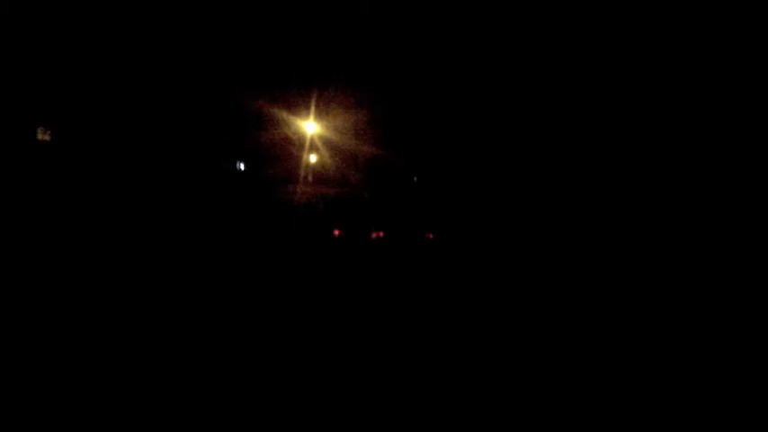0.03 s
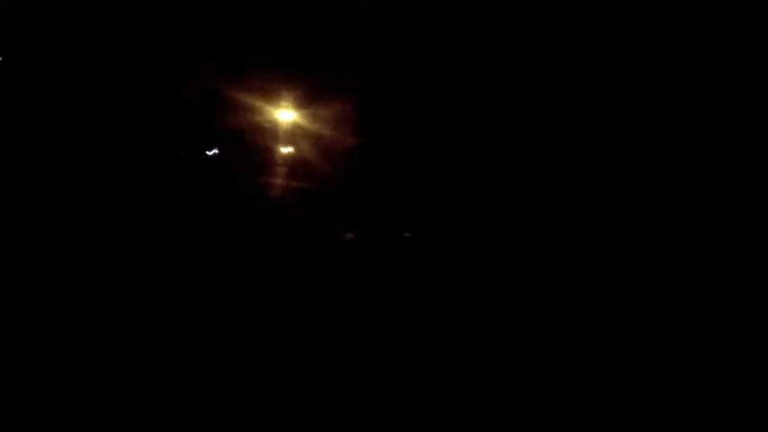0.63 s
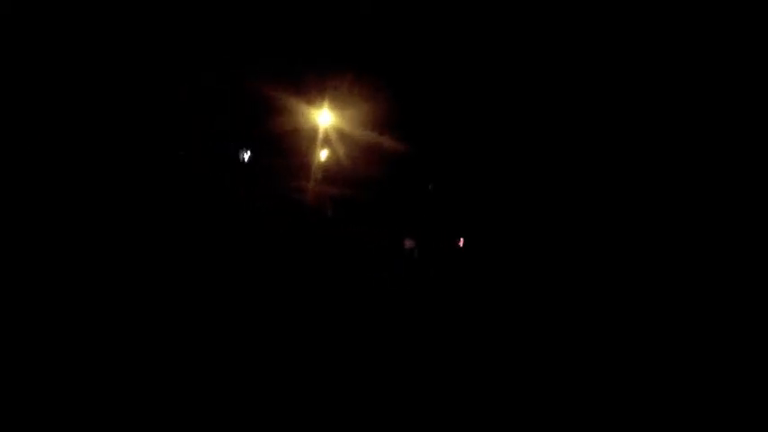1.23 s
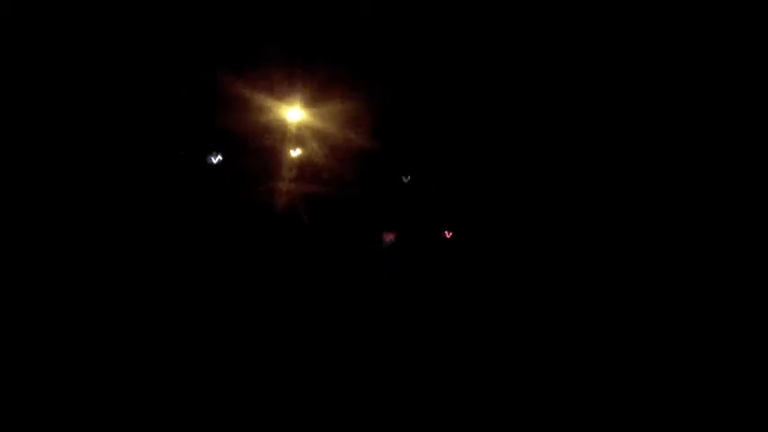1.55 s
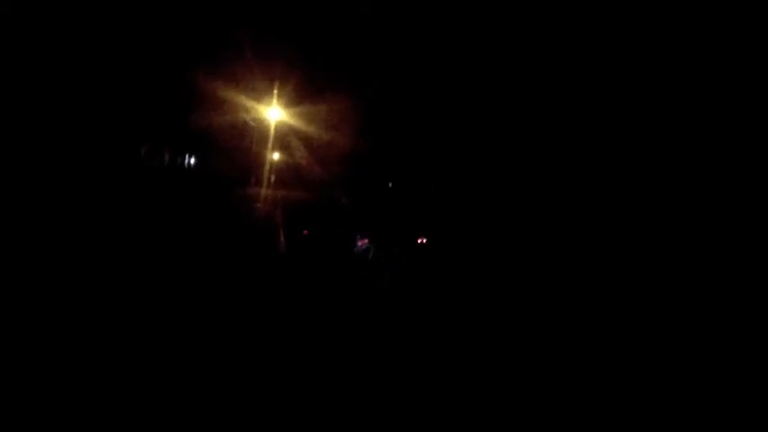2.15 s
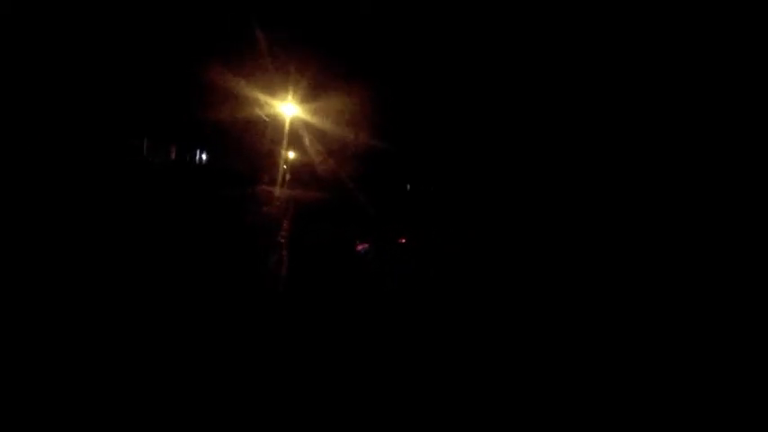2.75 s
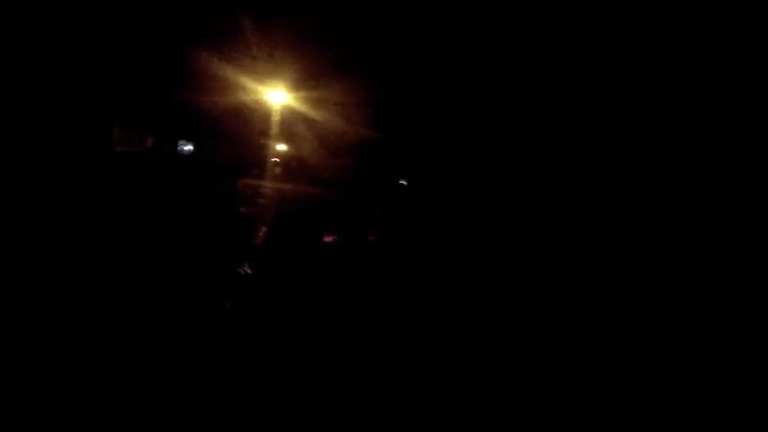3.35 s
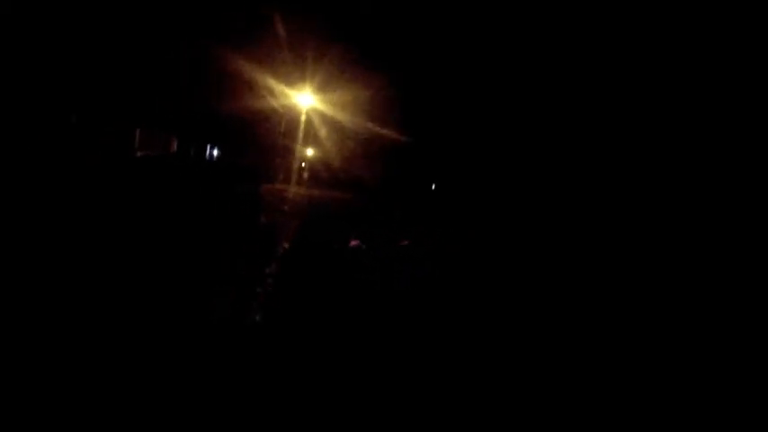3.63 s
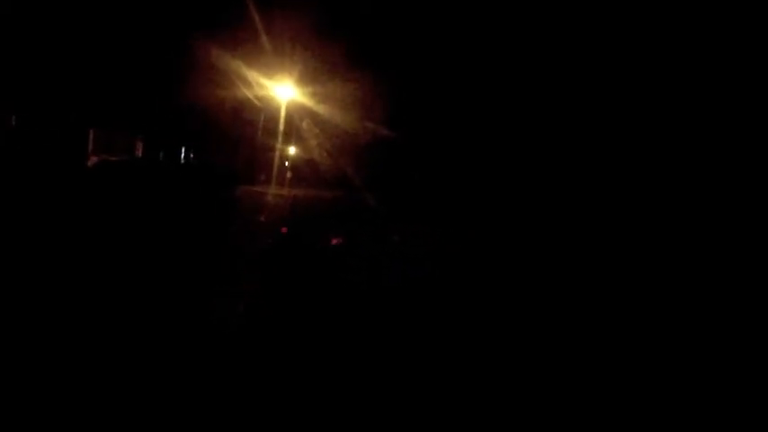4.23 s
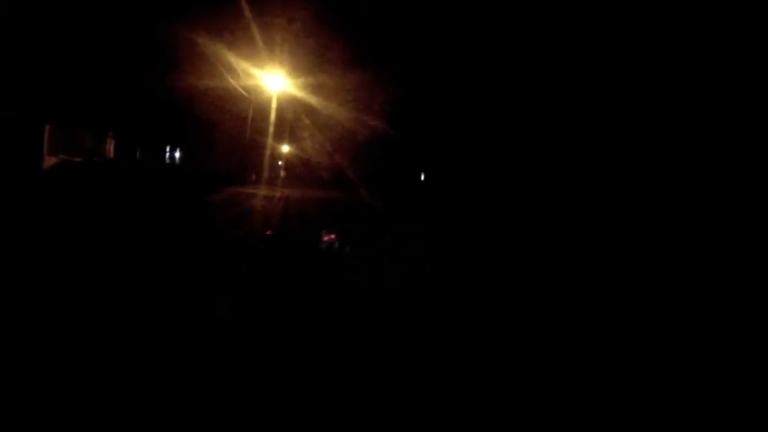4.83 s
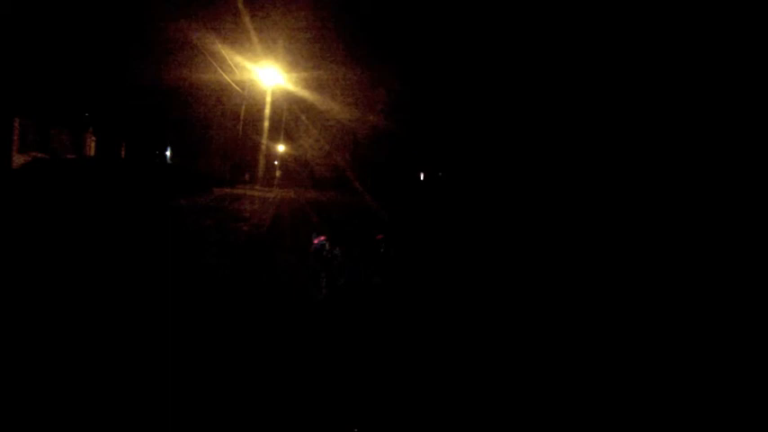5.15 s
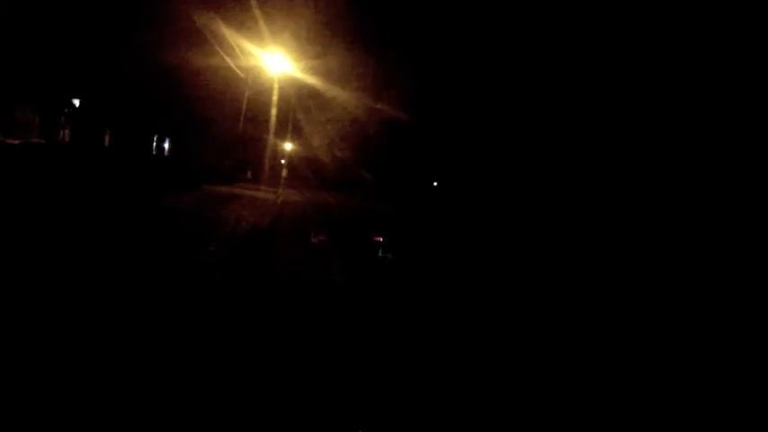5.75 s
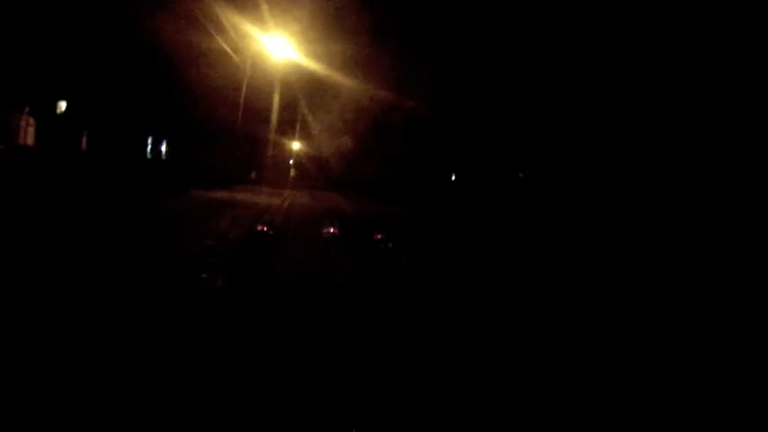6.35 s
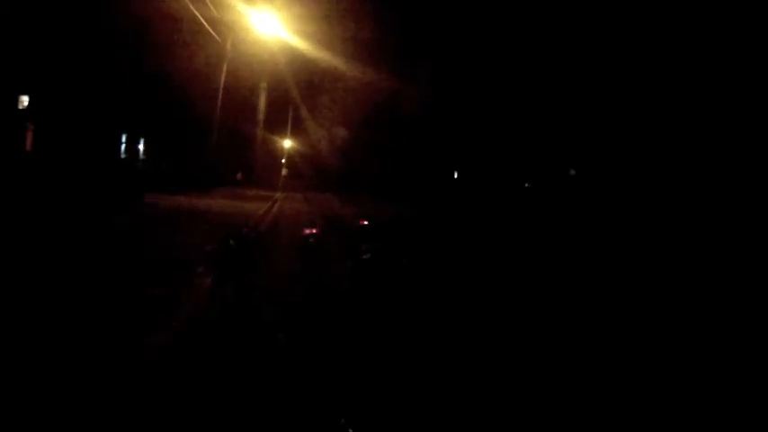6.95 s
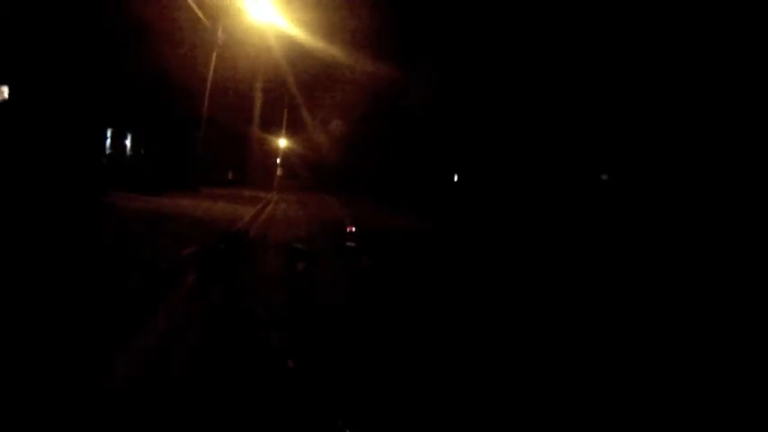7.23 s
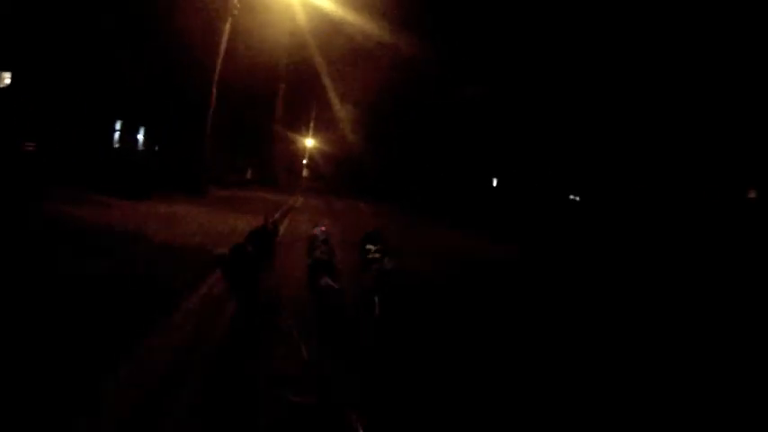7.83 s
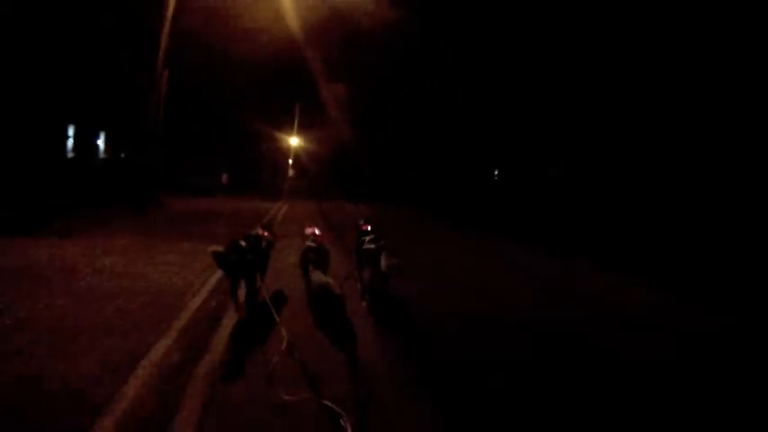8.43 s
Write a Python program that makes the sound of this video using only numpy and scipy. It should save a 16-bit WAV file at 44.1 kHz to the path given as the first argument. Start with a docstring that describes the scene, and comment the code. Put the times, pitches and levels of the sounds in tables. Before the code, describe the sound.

Deep, uneven rumble of a cart rolling on a paved road, with droning tyres, small knocks and a few metal ticks.

```python
"""The frame of a wheeled dog rig shudders near 37 Hz as it rolls along pavement at night.
Jolts throw the frame into a swing, seams thump, and the tyres drone through its tubes.
Loose fittings chatter, knock and squeak, a metal snap ticks, and the running gear whines thinly.
The shudder is strong enough to make the microphone crackle on its crests."""
import sys
import numpy as np
from scipy import signal
from scipy.fft import rfft, irfft
from scipy.io import wavfile
from scipy.ndimage import uniform_filter1d

SR = 44100
rng = np.random.default_rng(int(sys.argv[2]) if len(sys.argv) > 2 else 0)


def digitize_waveform(pressure):
    """Quantize a signal to 16-bit integers and store it at the path in sys.argv[1].

    Rows of a 2-D input are taken as channels; values are limited to [-1, 1].
    """
    field = np.atleast_2d(pressure).T
    bounded = np.clip(field, -1, 1)
    quanta = np.round(bounded * 32767).astype(np.int16)
    wavfile.write(sys.argv[1], SR, quanta)


N = 379260
T = np.arange(N) / SR
BINS = np.fft.rfftfreq(8192, 1 / SR)

# Levels in the tables are relative: the functions add their own gains.
# pitch of the frame's slowest swing: t/s, f/Hz
SWING_PITCH = [(0, 38.1), (6.0, 38.56), (7.6, 33.2), (8.6, 34.47)]
# jolts that shake the frame: t/s, dip of the swing just before/dB
FRAME_JOLTS = [(0.0399, 16.5), (0.24, 11), (0.387, 9), (0.67, 19), (0.788, 13.5), (1.2317, 10),
               (1.438, 3.5), (2.052, 9.5), (2.1975, 10.5), (2.471, 14), (2.7809, 11.5), (3.199, 14.5),
               (3.491, 10), (3.8928, 8), (4.071, 8.5), (4.462, 24), (4.789, 8), (5.19, 18.5),
               (5.5566, 10.5), (6.072, 10), (6.231, 10.5), (6.55, 11.5), (6.781, 16), (6.8974, 13.5),
               (7.026, 13), (7.513, 19), (8.0675, 9.5), (8.257, 12)]
# hard crests of the swing, on which the microphone crackles: t/s, level/dB
CRESTS = [(0.045, -49.5), (0.5002, -50), (0.5118, -53.5), (0.7863, -53), (0.8329, -50), (0.9122, -54),
          (1.0135, -55.5), (1.0271, -51), (1.2318, -49), (1.625, -53.5), (1.761, -56), (2.2005, -54),
          (2.2801, -57.5), (2.4828, -55.5), (2.5442, -53.5), (2.783, -53.5), (2.9356, -53.5), (3.035, -52),
          (3.243, -54.5), (3.4896, -52.5), (3.536, -51.5), (3.8837, -51), (4.2613, -51.5), (4.632, -46.5),
          (4.8946, -56.5), (5.094, -53), (5.298, -55), (5.316, -51.5), (5.559, -51), (5.6517, -55),
          (5.7939, -54), (5.866, -49), (6.0753, -51.5), (6.3528, -53), (6.4145, -50.5), (6.6615, -52),
          (6.8982, -48), (7.0269, -50.5), (7.1733, -53), (7.6644, -49), (7.8804, -44.5), (8.0692, -50.5),
          (8.3912, -48.5)]
# a wheel drops over a seam in the pavement: t/s, level/dB
SEAMS = [(0.508, -20.5), (0.842, -15.5), (1.231, -16.5), (2.783, -13.5), (5.283, -12), (7.639, -6)]
# the pavement between its rough patches: t/s, drone level/dB, chatter level/dB
ROAD_LEVELS = [(0, -39.5, -46.5), (1.1, -44.5, -51), (2.6, -44.5, -53.5), (3.3, -34, -49.5),
               (3.65, -37.5, -55), (4.38, -40.5, -61.5), (4.6, -35, -51.5), (5.05, -33.5, -48),
               (5.36, -35.5, -57.5), (5.48, -33.5, -50.5), (5.8, -33.5, -47), (6.15, -39.5, -52),
               (6.7, -31.5, -41), (7.3, -35.5, -48), (8.2, -34, -47.5), (8.6, -28.5, -40.5)]
# rough patches: t/s, length/s, rise of the drone/dB, rise of the chatter/dB
ROUGH_PATCHES = [(0.015, 0.022, 3, 4), (0.13, 0.069, 0, 6), (0.349, 0.048, 9, 9), (0.636, 0.075, 8.5, 9),
                 (0.739, 0.099, 9, 8.5), (0.896, 0.046, 6.5, 8.5), (0.996, 0.033, 6.5, 1),
                 (1.162, 0.093, 3.5, 7.5), (1.367, .1, 2, 6), (1.532, 0.06, 9, 11), (1.689, 0.12, 2, 7),
                 (2.04, 0.063, 3, 8), (2.417, 0.06, 9, 4.5), (2.668, 0.083, 10.5, 13.5),
                 (2.829, 0.041, 5.5, 10.5), (3.39, 0.14, 7, 6), (3.855, 0.039, 6, 10.5), (4.104, .18, 4, 7),
                 (4.489, 0.13, 4.5, 8), (5.139, 0.088, 4.5, 8.5), (5.258, 0.037, 12, 14),
                 (5.519, 0.15, 4.5, 2), (5.733, 0.12, 6, 1), (5.981, 0.1, 5.5, 7), (6.258, 0.14, 7, 8),
                 (6.851, 0.051, 7, 2.5), (6.997, .13, 4, 4), (7.456, 0.145, 9.5, 12), (7.617, 0.04, 15, 13),
                 (7.683, .11, 7.5, 8.5), (7.81, 0.06, 12.5, 11), (8.022, 0.055, 3, 7)]
# hum of the tyre tread: t/s, f/Hz, level against the drone/dB
TREAD_HUM = [(0, 98.4, -4.5), (2.9, 98.44, -13), (3.45, 143.9, -5.5), (3.8, 138.5, -7.5), (4.5, 147.1, 1.5),
             (5.0, 152, 3.5), (5.4, 153, -6), (6.2, 174.1, -2), (7.0, 178, -1.5), (8.6, 178.3, -10.5)]
# tones in that hum: multiple of the pitch, level/dB
TREAD_TONES = [(1, 3), (2, 0), (3, -10.5), (4, -4.5)]
# resonances of the frame (pitches at which it rings): f/Hz, width/Hz, level/dB
FRAME_RING = [(63, 38.3, 3.5), (175, 30.5, -3.5), (195.3, 23.2, 2), (267, 20.2, -1.5), (315, 86, -8),
              (385.7, 46, -15), (559.5, 76, -17.5), (868, 184, -25.5)]
# resonances of the fittings: f/Hz, width/Hz, level/dB
FITTING_RING = [(203, 170, -13.5), (607, 92, 1), (794, 100, 2.5), (936, 170, 1), (1342, 220, 4.5),
                (1520, 129, 2.5), (1660, 220, -9), (2171, 97, 4), (2409, 151, -5.5), (3110, 530, -22.5),
                (3810, 120, -21.5), (4380, 260, -28), (5080, 770, -32), (7360, 2400, -41)]
# dead spots, where the fittings ring less: f/Hz, width/Hz, depth/dB
FITTING_DEAD_SPOTS = [(720, 38, 5), (1047, 55, 5)]
# single knocks of the fittings: t/s, level/dB
FITTING_KNOCKS = [(0.0253, -29.5), (0.1226, -32.5), (0.1422, -31.5), (0.3451, -35), (0.4958, -35.5),
                  (0.5457, -43.5), (0.6395, -38), (0.6667, -30.5), (0.686, -32), (0.704, -34),
                  (0.8104, -28.5), (0.8913, -32.5), (0.9193, -33), (1.0276, -33.5), (1.1575, -35.5),
                  (1.3543, -40.5), (1.3783, -36), (1.5748, -33.5), (2.0273, -40.5), (2.4693, -33),
                  (2.6594, -34), (2.6803, -31.5), (2.699, -30.5), (2.722, -33), (2.761, -33), (2.8222, -37),
                  (2.8424, -33.5), (5.6515, -32), (6.656, -35), (7.084, -30), (7.2022, -34.5),
                  (7.4544, -31), (7.4748, -35), (7.657, -27.5), (7.9847, -35.5)]
# ticks of the metal snap: t/s, peak level/dB
SNAP_TICKS = [(1.058, -38.5), (1.131, -37), (1.231, -40), (1.617, -30.5), (1.8064, -20.5), (1.836, -34),
              (1.929, -35.5), (1.9604, -36), (2.345, -38), (2.5763, -38.5), (2.9233, -37.5), (2.9552, -42)]
# resonances of the snap: f/Hz, width/Hz, level/dB
SNAP_RESONANCES = [(900, 600, -4), (1710, 280, 13.5), (2177, 220, 5.5), (3400, 390, -11.5),
                   (4100, 300, -16.5), (5660, 1500, -32.5)]
# the whine comes up as the rig gathers speed: t/s, level against the chatter/dB
WHINE_RISE = [(3, -25), (6.0, -14), (6.6, -12), (8.6, -9)]
# resonances of the running gear: f/Hz, width/Hz, level/dB
GEAR_RING = [(794, 20, 1.5), (3340, 95, -26.5), (3720, 120, -25), (7500, 290, -45)]
# squeaks: t/s, length/s, start f/Hz, settled f/Hz, level/dB, roughness as a share of the pitch
METAL_SQUEAKS = [(0.29, 0.075, 3800, 4330, -71, .006), (0.314, 0.1, 3870, 4130, -62, .005),
                 (0.329, 0.135, 4630, 4830, -65, .004), (0.301, 0.195, 4480, 5300, -67, .012),
                 (0.31, 0.17, 7500, 7850, -72, .022), (8.099, 0.11, 8060, 7440, -66, .04)]
# tone colour of the crackle: f/Hz, level/dB
CRACKLE_COLOUR = [(300, 1), (1500, 3), (3000, -6), (5000, -10.5), (9000, -16.5), (13000, -21), (16000, -31)]


def shudder(drift=0.0805, uneven_db=1.0, buzz_db=-23):
    """The frame swings and loses its beat where the swing is weak."""
    db = uniform_filter1d(swing_db(), SR // 60) + uneven_db * wander(10)
    weakness = np.minimum(gain_of(np.median(db) - db), 3)
    hz = curves(SWING_PITCH)[0] * (1 + drift * weakness * wander(12))
    swing = np.sqrt(2) * np.sin(phase_of(hz))
    # a dull low buzz near 90 Hz swells and fades with the shudder
    buzz = evened(through(rng.standard_normal(N), ring([(92, 55, 0)])))
    return gain_of(db) * (swing + gain_of(buzz_db) * buzz)


def swing_db(level_db=-14.5, sag_db_per_s=5, lead_s=0.042, dip_s=0.02, throw_db=1.5, throw_s=0.017):
    """A jolt first holds the swing back, then throws it to full height; it sags until the next one."""
    t = T[::SR // 1000]
    from_jolt, dip = t, 0
    for s, dip_db in FRAME_JOLTS:
        from_jolt = np.where(t > s - lead_s, abs(t - s), from_jolt)
        dip = dip + dip_db * np.exp(-.5 * ((t - s + lead_s) / dip_s) ** 2)
    throw = throw_db * np.exp(-from_jolt / throw_s)
    return np.interp(T, t, level_db + throw - sag_db_per_s * from_jolt - dip)


def thumps():
    """A short, deep thud comes with the crackle of each hard crest; pavement seams thump a bit higher."""
    return thuds(CRESTS, gain_db=31, hz=95, width_hz=90) + thuds(SEAMS, gain_db=-6, hz=155, width_hz=94)


def thuds(rows, gain_db, hz, width_hz):
    """One short, dull thud for each row, peaking at that row's time."""
    out, thud = np.zeros(N), ring([(hz, width_hz, 0)])
    peak_s = np.argmax(thud) / SR
    for s, db in rows:
        add(out, s - peak_s, gain_of(db + gain_db) * rng.choice([-1, 1]) * thud / thud.max())
    return out


def drone(lumpy_db=1.5, waver=0.02457, grain_db=2, hum_db=-1):
    """The grain of the pavement and the wavering hum of the tread both sound through the frame."""
    db, _ = road()
    pitch, share_db = curves(TREAD_HUM)
    frame, lumps = ring(FRAME_RING), gain_of(lumpy_db * wander(25))
    grain = steadied(through(lumps * rng.standard_normal(N), frame), span_s=0.14)
    phase = phase_of(pitch * (1 + waver * wander(25)))
    tread = sum(gain_of(tone_db + 2 * wander(4.4)) * np.sin(k * phase) for k, tone_db in TREAD_TONES)
    hum = steadied(through(lumps * tread, frame), span_s=0.24)
    return gain_of(db) * (gain_of(grain_db) * grain + gain_of(share_db + hum_db) * hum)


def road(rise_s=0.013, fall_s=0.025):
    """Levels of drone and chatter in dB: each rough patch lifts them, holds them and lets go."""
    drone_db, chatter_db = curves(ROAD_LEVELS)
    for s, length, drone_rise, chatter_rise in ROUGH_PATCHES:
        on = np.clip(np.minimum(1 + (T - s) / rise_s, 1 - (T - s - length) / fall_s), 0, 1)
        drone_db += drone_rise * on
        chatter_db += chatter_rise * on
    return drone_db, chatter_db


def chatter(taps_per_s=80, scrape_s=0.0024, rub_db=0.5, rub_follow=0.43, gain_db=-1.5):
    """Loose fittings tap brightly; on rough road they stay in touch and rub with a duller sound."""
    drone_db, db = road()
    # each tap stays in contact for a moment and grinds
    scrape = np.exp(-T[:SR // 30] / scrape_s)
    contact = evened(np.sqrt(abs(through(clicks(taps_per_s, spread_db=4) ** 2, scrape))))
    pressure = gain_of(rub_db + rub_follow * (drone_db - drone_db.mean()))
    taps = through(contact * rng.standard_normal(N), fittings(tilt_db=1.5))
    rub = through(pressure * whirred(rng.standard_normal(N)), fittings(tilt_db=0))
    return gain_of(db + gain_db) * steadied(taps + rub, span_s=0.07)


def whirred(x, repeat=0.34, waver=.02):
    """Each block of the tread repeats part of the rub before it: a whirr that glides with the speed."""
    period = 1 / (curves(TREAD_HUM)[0] * (1 + waver * wander(5)))
    return evened(x + repeat * np.interp(T - period, T, x))


def fittings(tilt_db):
    """How the fittings ring after a tap; their resonances gain tilt_db with each octave up."""
    modes = [(hz, width, db + tilt_db * np.log2(hz)) for hz, width, db in FITTING_RING]
    body = ring(modes, FITTING_DEAD_SPOTS)
    return body / np.linalg.norm(body)


def knocks(gain_db=20, grit=0.087, scrape_s=0.0062):
    """A fitting lands: one sharp blow, then a short gritty scrape as it settles."""
    out, t, body = np.zeros(N), T[:SR // 30], fittings(tilt_db=2.5)
    for s, db in FITTING_KNOCKS:
        force = (t == 0) + grit * np.exp(-t / scrape_s) * rng.standard_normal(len(t))
        knock = signal.fftconvolve(force, body)
        add(out, s, gain_of(db + gain_db) * knock / np.linalg.norm(knock))
    return out


def snaps(brighten=0.89, bounce_s=0.00041, uneven=0.11, fall_db=11, tail_db=-30, tail_s=0.0066):
    """A metal snap on the line ticks against the rig: three quick, fading bounces and a gritty tail."""
    out, t = np.zeros(N), T[:SR // 40]
    usual_db = np.median([db for _, db in SNAP_TICKS])
    for s, db in SNAP_TICKS:
        tilt_db = brighten * (db - usual_db)  # a harder blow is brighter
        body = ring([(hz, width, level + tilt_db * np.log2(hz)) for hz, width, level in SNAP_RESONANCES])
        force = gain_of(tail_db) * np.exp(-t / tail_s) * rng.standard_normal(len(t))
        for k in range(3):
            add(force, bounce_s * (k + uneven * rng.standard_normal()), gain_of([-fall_db * k]))
        tick = signal.fftconvolve(force, body)
        add(out, s, gain_of(db) * tick / abs(tick).max())
    return out


def whine():
    """The running gear rings thinly with the shaking of the road, more as the speed grows."""
    _, chatter_db = road()
    sing = steadied(through(rng.standard_normal(N), ring(GEAR_RING)), span_s=0.18)
    return gain_of(chatter_db + curves(WHINE_RISE)[0]) * sing


def squeaks(settle=0.79, rough_hz=500, gain_db=-1):
    """Rubbing metal sings in brief, thin tones; each pitch slides and settles."""
    out = np.zeros(N)
    for s, length, start_hz, settled_hz, db, rough in METAL_SQUEAKS:
        progress = np.clip((T - s) / length, 0, 1)
        slide = np.sin(np.pi * progress / settle / 2)
        hz = (start_hz + (settled_hz - start_hz) * slide) * (1 + rough * wander(rough_hz))
        out += gain_of(db + gain_db) * np.sin(np.pi * progress) * np.sin(phase_of(hz))
    return out


def crackle(x, threshold=0.23, sink_per_s=0.98, between=0.22, patchy_db=4, click_db=-63, hiss_db=-76):
    """The microphone hisses and clicks faintly, clicking louder where a crest tops those just before."""
    recent_peak = np.maximum.accumulate(np.maximum(abs(x), threshold) + sink_per_s * T) - sink_per_s * T
    on_crest = 1. * (abs(x) > .95 * recent_peak)
    crest = np.sqrt(abs(uniform_filter1d(on_crest, SR // 400)))
    force = (crest + between) * gain_of(patchy_db * np.minimum(wander(40), 1))
    ticks = gain_of(click_db) * evened(clicks(per_s=3500, spread_db=7) * force)
    hiss = gain_of(hiss_db) * rng.standard_normal(N)
    hz, db = np.transpose(CRACKLE_COLOUR)
    colour = blow_response(gain_of(np.interp(np.log(BINS + 1), np.log(hz), db)))
    return through(ticks + hiss + crest_bursts(), colour / np.linalg.norm(colour))


def crest_bursts(gain_db=5, width_s=0.0015, click_share=0.13, fall_db=6):
    """A hard crest sets off three fading bursts of crackle, half a swing apart."""
    out, t = np.zeros(N), T[:SR // 125]
    half_swing_s = .5 / curves(SWING_PITCH)[0].mean()
    swell = np.exp(-.5 * ((t - t.mean()) / width_s) ** 2)
    for s, db in CRESTS:
        for k in range(3):
            burst = evened(swell * rng.standard_normal(len(t)) * (rng.random(len(t)) < click_share))
            add(out, s - t.mean() + k * half_swing_s, gain_of(db + gain_db - fall_db * k) * burst)
    return out


def ring(modes, dead_spots=()):
    """How a body with these resonances and dead spots rings after one sharp blow."""
    power = sum((gain_of(db) / (1 + 2 * ((BINS - hz) / width) ** 2)) ** 2 for hz, width, db in modes)
    hollow_db = sum(db / (1 + ((BINS - hz) / width) ** 2) for hz, width, db in dead_spots)
    return blow_response(np.sqrt(power) * gain_of(-hollow_db))


def blow_response(gain):
    """Turns a gain for each frequency into a ring that sounds only after the blow."""
    cepstrum = irfft(np.log(gain / gain.max() + 1e-6))
    half = len(cepstrum) // 2
    # move what would come before the blow to after it
    cepstrum[1:half] *= 2
    cepstrum[half + 1:] = 0
    return irfft(np.exp(rfft(cepstrum)))[:half]


def through(x, response):
    """Passes a sound through a body."""
    return signal.oaconvolve(x, response)[:N]


def clicks(per_s, spread_db):
    """Random clicks, most small and a few large."""
    size = gain_of(spread_db * np.minimum(rng.exponential(1, N), 3))
    return size * rng.choice([-1, 1], N) * (rng.random(N) < per_s / SR)


def wander(rate_hz):
    """A random wobble of typical size 1, no faster than about rate_hz."""
    hz = np.fft.rfftfreq(N, 1 / SR)
    return evened(irfft(rfft(rng.standard_normal(N)) / (1 + (hz / rate_hz) ** 4), N))


def steadied(x, span_s):
    """Holds the level near 1 over span_s and leaves the faster grain."""
    return x / np.sqrt(abs(uniform_filter1d(x ** 2, int(span_s * SR))) + 1e-12)


def evened(x):
    """Scales a signal to a typical size (rms) of 1."""
    return x / np.sqrt(np.mean(x ** 2) + 1e-20)


def gain_of(db):
    """Turns decibels into a multiplier."""
    return 10 ** (np.asarray(db) / 20)


def phase_of(hz):
    """The running angle of a tone whose pitch changes."""
    return 2 * np.pi * np.cumsum(hz) / SR


def curves(rows):
    """Each column after the time column, joined by straight lines in time."""
    s, *columns = np.transpose(rows)
    return [np.interp(T, s, column) for column in columns]


def add(mix, s, sound):
    """Lays a sound into the mix at s seconds."""
    part = mix[max(round(s * SR), 0):][:len(sound)]
    part += sound[:len(part)]


def scene():
    """All the sounds of the rolling rig, in one channel."""
    return (shudder() + thumps() + drone() + chatter() + knocks() + whine() + snaps() + squeaks())[None]


def record(dry, fade_s=.02, top_hz=15600):
    """Adds the microphone's crackle, fades both ends and cuts the highest treble."""
    fade = np.minimum(np.minimum(T, T[::-1]) / fade_s, 1)
    wet = (dry[0] + crackle(dry[0])) * fade
    treble_cut = signal.firwin(511, top_hz, window=("kaiser", 9), fs=SR)
    return signal.oaconvolve(wet, treble_cut, "same")[None]


dry = scene()
out = record(dry)
digitize_waveform(out)
```